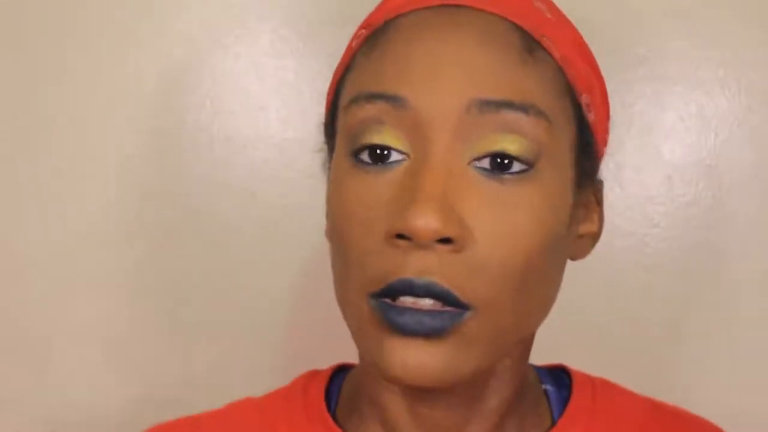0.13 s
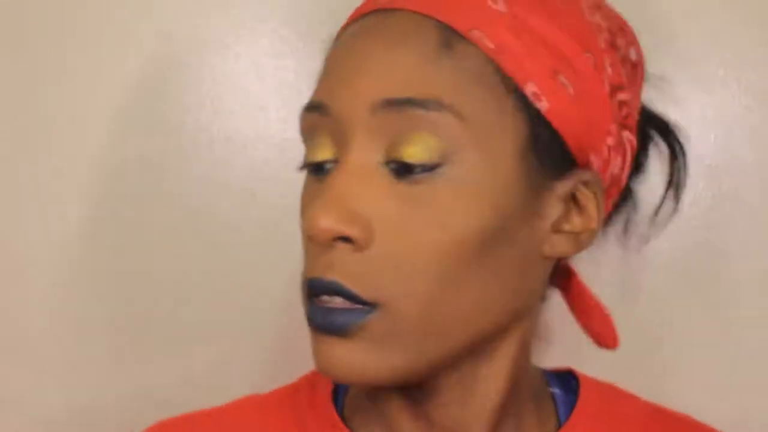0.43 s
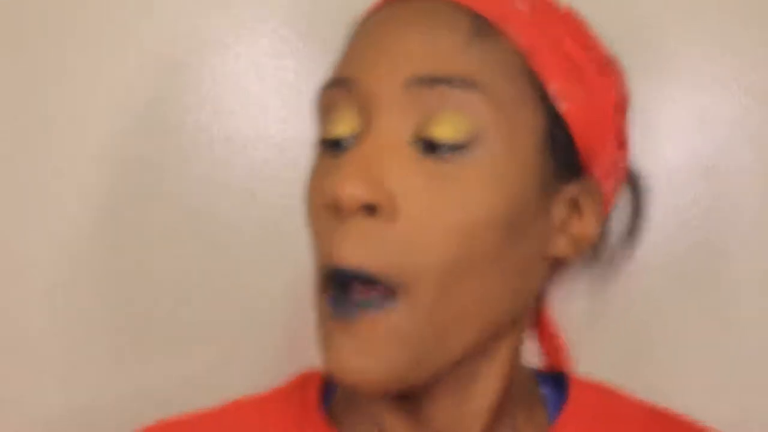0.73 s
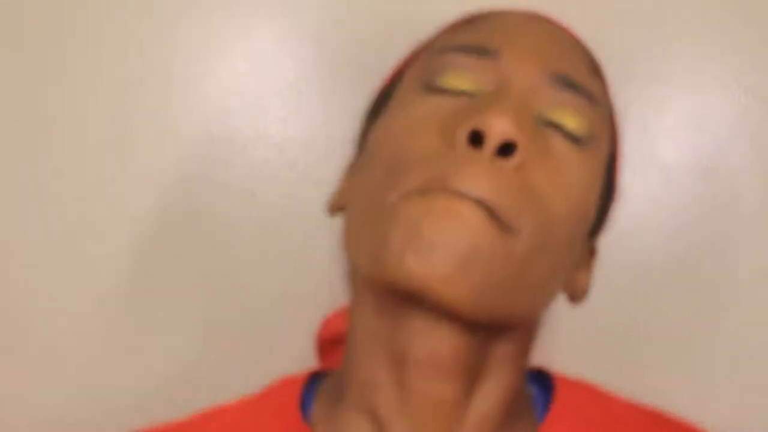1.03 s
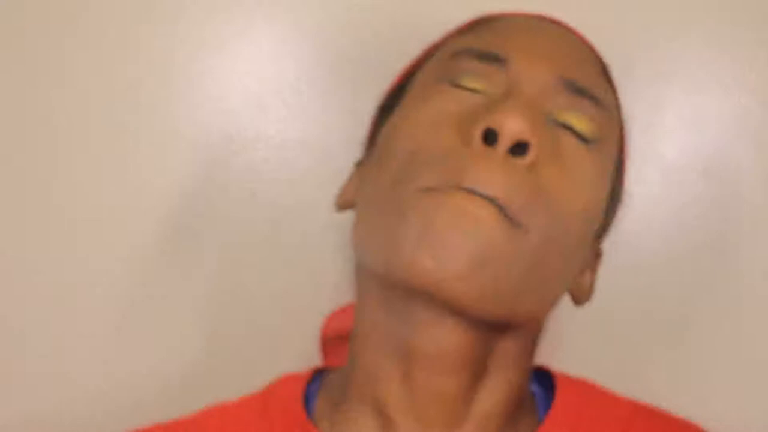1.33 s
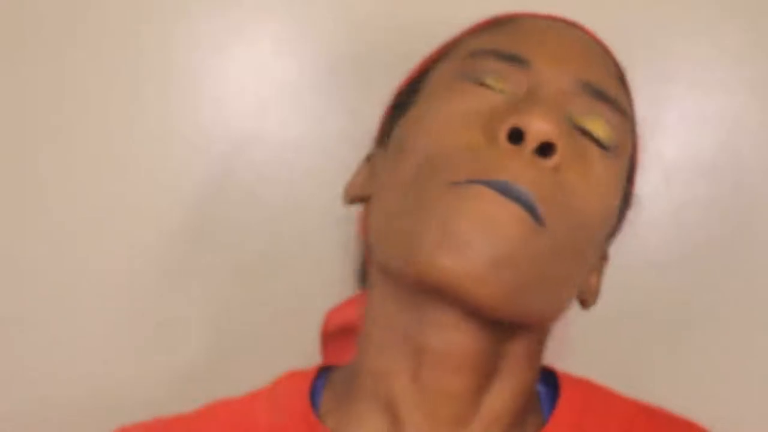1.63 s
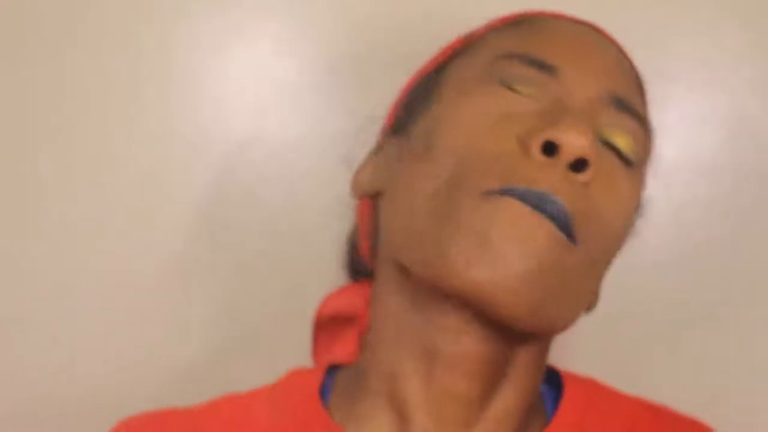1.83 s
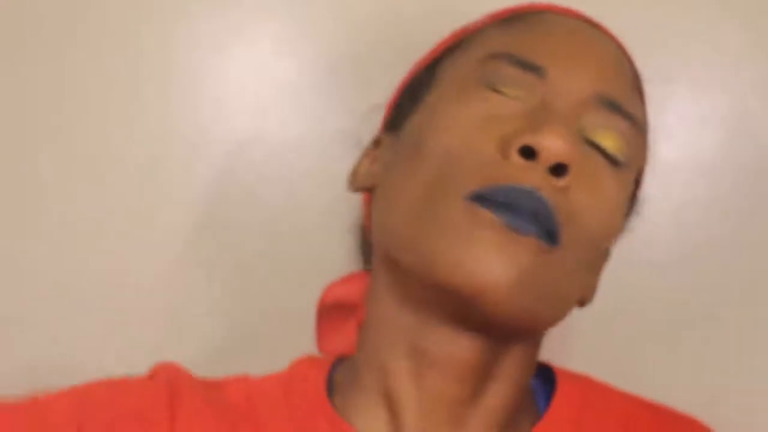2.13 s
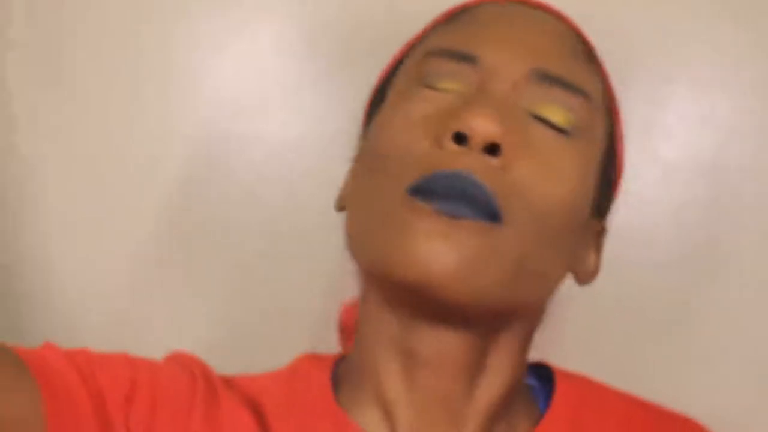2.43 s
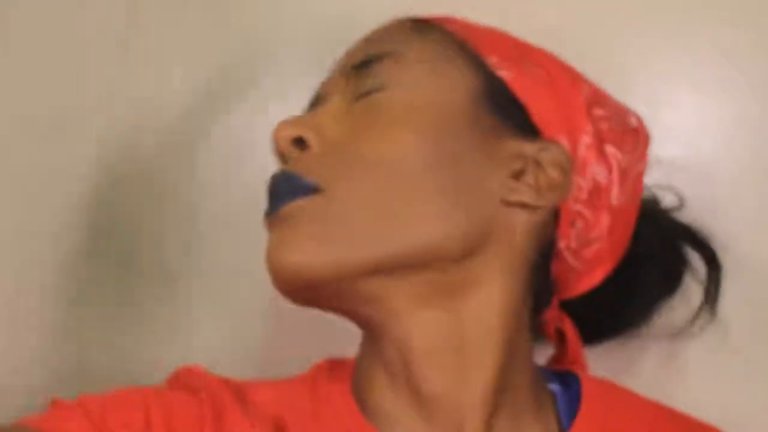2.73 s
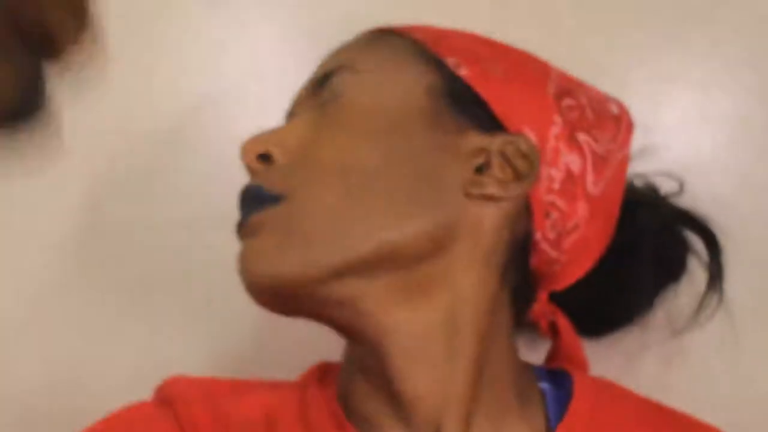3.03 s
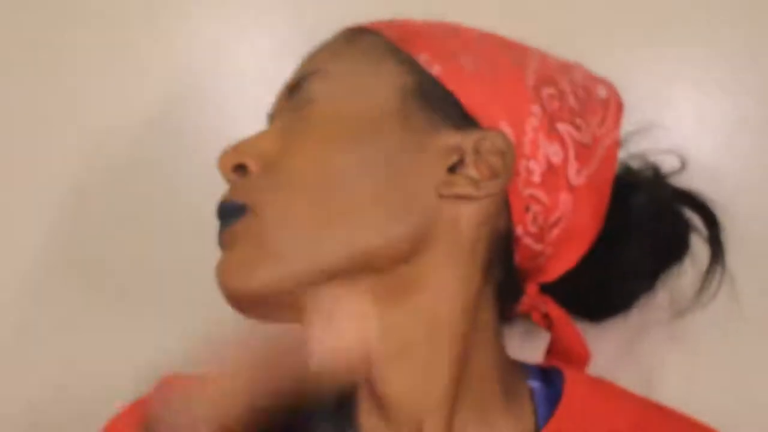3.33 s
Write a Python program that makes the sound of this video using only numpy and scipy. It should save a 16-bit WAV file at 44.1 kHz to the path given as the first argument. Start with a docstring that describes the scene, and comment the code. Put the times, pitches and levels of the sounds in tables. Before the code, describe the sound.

Spray bottle pumped six times, short misty hisses with plastic clicks, after handling knocks and cap snap

```python
"""A spray bottle's finger pump is pressed six times: each stroke hisses out a mist of filtered noise
and droplet ticks, then the plunger sucks back (slips through a rising resonance) and clicks.
Before that, plastic knocks and scrapes as the bottle is picked up; its cap snaps off and is put
aside, made from short contacts that ring. A small, hard-walled room adds echoes and a faint hum."""
import sys
import numpy as np
from scipy import signal
from scipy.fft import rfft, irfft, next_fast_len
from scipy.io import wavfile
from scipy.ndimage import uniform_filter1d, map_coordinates

SR = 44100
rng = np.random.default_rng(int(sys.argv[2]) if len(sys.argv) > 2 else 0)


def unload_audio(sound):
    """Save the sound as a 16-bit wav file, at the path given as the first command line argument."""
    columns = np.transpose(np.atleast_2d(sound))
    # keep every value between -1 and 1, then stretch to whole-number steps
    steps = np.round(np.clip(columns, -1, 1) * 32767)
    wavfile.write(sys.argv[1], SR, steps.astype(np.int16))


N = 154350
TIME = np.arange(N) / SR

# tone of the mist and of the spring's rustle: (frequency [Hz], relative level [dB])
MIST_TONE = [(150, -32), (400, -20.5), (1150, -13.5), (1650, -6), (2800, -2), (4200, -2.5), (6000, -1.5),
             (9400, -6), (10600, -5.5), (13000, -11.5), (15500, -19)]


def amp(db):
    """Decibels to gain."""
    return 10 ** (np.asarray(db) / 20)


def unit(x):
    """Scale to an average strength (rms) of 1."""
    return x / np.sqrt(np.mean(x ** 2) + 1e-20)


def along(points, hz):
    """Read a curve of (Hz, value) points on a log frequency axis."""
    f, v = np.transpose(points)
    return np.interp(np.log(hz + 1), np.log(f + 1), v)


def filtered(x, response):
    """Multiply the spectrum of x by a function of frequency."""
    size = next_fast_len(N + SR // 2)
    spectrum = rfft(x, size) * response(np.fft.rfftfreq(size, 1 / SR))
    return irfft(spectrum, size)[..., :N]


def body(x, tone, size=2048):
    """Colour a sound without smearing it backwards in time; a click keeps its energy."""
    # folding the cepstrum (spectrum of the log spectrum) gives a response that only rings onwards
    cepstrum = irfft(np.log(amp(along(tone, np.fft.rfftfreq(size, 1 / SR)))))
    cepstrum[1:size // 2] *= 2
    cepstrum[size // 2 + 1:] = 0
    response = irfft(np.exp(rfft(cepstrum)))
    return signal.fftconvolve(x, response / np.linalg.norm(response))[:N]


def noise(tone):
    """Coloured noise of rms 1."""
    return unit(body(rng.standard_normal(N), tone))


def wobble(rate):
    """A smooth random curve through this many random points a second."""
    points = rng.standard_normal(int(N * rate / SR) + 4)
    return map_coordinates(points, [TIME * rate])


def fade(start, life):
    """A sudden start and an exponential fall; life is the time [s] to fall to 37 percent."""
    return (TIME >= start) * np.exp(-np.abs(TIME - start) / life)


def ticks(rate):
    """Tiny contacts of random size, about this many a second."""
    return (rng.random(N) < rate / SR) * rng.standard_normal(N)


def impulse(s):
    """One sharp contact, a single sample long."""
    return signal.unit_impulse(N, int(s * SR))


def contact(s):
    """A blow smeared over a millisecond or so by the thin plastic wall."""
    t = np.arange(256) / SR
    smear = np.exp(-t / 0.00037) * rng.standard_normal(len(t))
    # keep only the phases: every frequency is equally strong
    burst = irfft(np.exp(1j * np.angle(rfft(smear))))
    return np.pad(burst, (int(s * SR), N))[:N]


def click(s, ring_db, t60, strike=impulse):
    """A contact and the dense short ring of plastic, which falls 60 dB in t60 seconds."""
    ring = fade(s, t60 / np.log(1000)) * rng.standard_normal(N)
    return strike(s) + amp(ring_db) * ring / np.linalg.norm(ring)


def ringing(x, hz):
    """Lift the resonance of the spot that is struck."""
    b, a = signal.iirpeak(hz, 2.66, SR)  # 2.66: sharpness (Q)
    return x + amp(1.5) * signal.lfilter(b, a, x)


def patchy(x):
    """Each band of the sound swells and sinks a little on its own."""
    bands = signal.stft(x)[2]
    field = rng.standard_normal(bands.shape)
    field = uniform_filter1d(field, size=5, axis=0)  # neighbouring frequencies
    field = uniform_filter1d(field, size=12, axis=1)  # neighbouring moments
    swells = amp(0.73 * unit(field))
    return unit(signal.istft(bands * swells)[1][:N])


def floor():
    """Steady noise of the room's air and two slightly unsteady hum tones."""
    # tone of the air: (frequency [Hz], relative level [dB])
    air_tone = [(20, -2), (40, -4), (80, 0), (300, 0), (600, -5), (1500, -5.5), (4000, -17), (10000, -16.5),
                (15500, -29)]
    # stereo width of the air: (frequency [Hz], side over mid [dB])
    width = [(80, -3), (150, -0.5)]
    # hum tones: (frequency [Hz], average level [dB])
    hum_tones = [(80, -66.5), (140, -70.5)]
    mid = noise(air_tone)
    side = filtered(noise(air_tone), lambda f: amp(along(width, f)))
    hum = 0
    for hz, db in hum_tones:
        level = amp(db + 0.9 * wobble(rate=4.53))
        phase = 2 * np.pi * hz * TIME + 1.0 * wobble(rate=4.47)
        hum = hum + level * np.sqrt(2) * np.sin(phase)
    return amp(-56.5) * np.array([mid + side, mid - side]) + hum


def clatter():
    """Plastic knocks, each chattering on briefly, over the tiny contacts of sliding plastic."""
    # knocks: (time [s], relative level [dB], decay of the chatter [s], pitch of the ring [Hz])
    knock_list = [(.0378, -20.5, 0.0067, 10000), (.043, -18, 0.016, 4430), (0.0683, -19, 0.0045, 11600),
                  (0.1208, -14, .002, 3470), (0.1281, -14, 0.0025, 3050), (.133, -15, 0.021, 6160),
                  (0.2178, -18, 0.0058, 4000), (.223, -18, 0.02, 4380), (.293, -18, 0.0078, 2700),
                  (.298, -20, 0.014, 7800), (0.3998, -16.5, 0.0099, 2760), (0.4074, -22.5, 0.018, 4300),
                  (.448, -29, .003, 10000), (.528, -23, 0.002, 3440), (0.535, -23, 0.011, 6100),
                  (.578, -31, 0.0028, 9000), (.595, -28.5, 0.0034, 6100)]
    # tone of the knocks: (frequency [Hz], relative level [dB])
    knock_tone = [(150, -49), (500, -21.5), (1050, -11.5), (1740, -8), (2600, -0.5), (4500, -4.5),
                  (6500, -2.5), (8000, -9.5), (10500, -10.5), (15000, -30)]
    # loudness of the sliding: (time [s], level [dB])
    slide_level = [(0, -40), (.15, -35.5), (.2, -37.5), (.28, -46.5), (.345, -33.5), (.385, -41.5),
                   (.48, -44), (.495, -36.5), (.61, -41.5), (.66, -49), (.71, -62)]
    # tone of the sliding: (frequency [Hz], relative level [dB])
    slide_tone = [(200, -40), (900, -14), (1800, -7), (2700, -0.5), (4500, 0.5), (6500, -3), (8500, -11.5),
                  (15000, -26)]
    knocks = 0
    for s, db, life, hz in knock_list:
        chatter = amp(-6) * fade(s, life) * ticks(rate=2000)
        knocks = knocks + amp(db + 8) * ringing(contact(s) + chatter, hz)
    sliding = patchy(body(ticks(rate=5000), slide_tone))
    roughness = unit(amp(2 * wobble(rate=280)))
    sliding = sliding * amp(np.interp(TIME, *np.transpose(slide_level))) * roughness
    return body(knocks, knock_tone) + sliding


def cap():
    """A light tick and a hard snap as the cap comes off, then softer and duller knocks."""
    # blows: (time [s], relative level [dB], dull above [Hz])
    blow_list = [(0.7128, -18, 14000), (0.7172, -3.5, 9000), (0.7233, -21.5, 7500), (.773, -14.5, 4500),
                 (.812, -19, 4570)]
    # tone of the blows: (frequency [Hz], relative level [dB])
    blow_tone = [(150, -31), (500, -19), (1150, -7.5), (1600, -6), (2300, -1.5), (3200, -3), (4300, 3.5),
                 (5700, -2.5), (7700, -8.5), (11000, -8.5), (15000, -23)]
    blows = 0
    for s, db, hz in blow_list:
        blow = click(s, ring_db=-4.5, t60=0.14)
        dulled = filtered(blow, lambda f: 1 / (1 + np.sqrt(2) * 1j * f / hz - (f / hz) ** 2))
        blows = blows + amp(db + 7) * dulled
    return body(blows, blow_tone)


def put_down():
    """The hollow cap rattles, then lands with a compact clack: smeared blows with a short ring."""
    # blows: (time [s], relative level [dB], pitch of the ring [Hz])
    blow_list = [(0.8115, -16.5, 2150), (.819, -26, 1800), (0.829, -21, 2450), (0.849, -23.5, 2500),
                 (.975, -10.5, 1830)]
    # tone of the blows: (frequency [Hz], relative level [dB])
    blow_tone = [(150, -14), (380, 4.5), (900, -8.5), (1650, 5), (2450, 7.5), (4000, -5.5), (6000, -13),
                 (15000, -38)]
    blows = 0
    for s, db, hz in blow_list:
        blow = click(s, ring_db=-9, t60=0.045, strike=contact)
        blows = blows + amp(db - 3) * ringing(blow, hz)
    return body(blows, blow_tone)


def mist(start, length, db, rise, treble_db, jet_db):
    """The nozzle's hiss follows a pressure that builds and drains; its jet's whistle follows more steeply."""
    release_s, treble_hz, jet_hz = 0.031, 7500, 6120
    age = np.maximum(TIME - start, 0)
    build = np.sqrt((1 - np.exp(-age / rise)) * (1 - np.exp(-(age + 0.028) / rise)))
    drain = np.exp(-np.maximum(age - length, 0) / release_s)
    pressure = build * drain

    droplets = amp(-7.5) * unit(ticks(rate=1100))
    spray = patchy(body(rng.standard_normal(N) + droplets, MIST_TONE))
    hiss = filtered(spray, lambda f: amp(treble_db * f ** 4 / (f ** 4 + treble_hz ** 4)))

    # two random curves on a sine and a cosine make a narrow band of noise around jet_hz
    turn = 2 * np.pi * jet_hz * TIME
    whistle = unit(wobble(rate=1500) * np.sin(turn) + wobble(rate=1600) * np.cos(turn))
    jet = amp(jet_db) * pressure ** 2 * whistle
    sputter_db = 0.5 * wobble(rate=150)
    return amp(db + sputter_db) * pressure * (hiss + jet)


def gurgles():
    """Two faint low gulps of liquid in the bottle: quickly fading bands of noise."""
    # gulps: (time [s]); the last falls at the very end and is not heard
    gulp_times = [1.1, 1.622, 3.5]
    gulp_hz = 543
    band = filtered(rng.standard_normal(N),
                    lambda f: 1 / (1 + (2 * (f / gulp_hz - gulp_hz / (f + 1))) ** 2))
    return amp(-45.5) * unit(band) * sum(fade(s, 0.0052) for s in gulp_times)


def plunger():
    """The seal rasps back through a rising resonance; the plunger hits, rebounds twice, its spring rustles."""
    # returns: (time of the click [s], relative click level [dB], suck level [dB], rustle level [dB])
    return_list = [(1.376, -29, -39, -38.5), (1.803, -17, -44, -36.5), (2.2133, -12, -47, -42.5),
                   (2.5969, -10, -51, -42), (2.988, -9.5, -44.5, -39.5), (3.372, -17, -44.5, -42)]
    # tone of the clicks: (frequency [Hz], relative level [dB])
    click_tone = [(200, -23), (1200, -15.5), (2100, -9.5), (2900, 0.5), (3800, -8.5), (5000, 3), (6200, 5),
                  (8200, -6.5), (11000, -11.5), (15500, -19)]
    rebound_s, suck_lead_s = 0.0032, 0.027
    suck_hz, suck_rise, suck_width_hz = 2820, 58000, 400  # suck_rise in Hz per second
    clicks, rustle, suck = np.zeros((3, N))
    for s, click_db, suck_db, rustle_db in return_list:
        hit = click(s, ring_db=-21, t60=0.092, strike=contact)
        rebounds = sum(contact(s + k * rebound_s) for k in (1, 2))
        clicks += amp(click_db + 3.5) * (hit + amp(-7.5) * rebounds)
        rustle += amp(rustle_db) * fade(s, 0.037)

        # the resonance climbs to suck_hz at the click, then stays there
        pitch = suck_hz + suck_rise * np.minimum(TIME - s, 0)
        turn = np.exp(2j * np.pi * np.cumsum(pitch) / SR)
        # slips of equal size ring in a filter that turns along with the pitch
        slips = np.sign(ticks(rate=600)) / turn
        rung = signal.lfilter([1], [1, -np.exp(-np.pi * suck_width_hz / SR)], slips)
        rasp = unit(np.imag(rung * turn))
        swell = np.clip(2 * (TIME - s + suck_lead_s) / suck_lead_s, 0, 1)
        suck += amp(suck_db) * fade(s - suck_lead_s, 0.04) * swell * rasp
    spring = rustle * unit(body(ticks(rate=7100), MIST_TONE))
    return body(clicks, click_tone) + spring + suck


def room(x, wet_db, pan):
    """Direct sound, nearby walls and an echo tail that dies faster in the treble than in the bass."""
    # time for the tail to fall by 60 dB: (frequency [Hz], time [s])
    tail_t60 = [(500, 0.82), (2500, 0.58), (6000, 0.47), (10000, 0.51)]
    # tone of the echoes: (frequency [Hz], relative level [dB])
    echo_tone = [(600, -1), (1300, -3), (7000, -.5), (14000, -9)]
    hz, t, bands = signal.stft(rng.standard_normal((2, SR * 3 // 5)), SR, nperseg=256)
    decay = amp(-60 * t / along(tail_t60, hz)[:, None])
    tail = signal.istft(bands * decay, SR, nperseg=256)[1]
    t = np.arange(tail.shape[1]) / SR
    tail *= np.minimum(t / 0.0016, 1)

    # early echoes: scattered single reflections that start after 2 ms
    early = (rng.random(tail.shape) < 1500 / SR) * rng.standard_normal(tail.shape)
    early = early * (t > .002) * np.exp(-t / 0.0071)
    answer = tail / np.linalg.norm(tail, axis=1, keepdims=True)
    answer = answer + amp(-0.5) * early / np.linalg.norm(early, axis=1, keepdims=True)

    echoes = signal.fftconvolve(x[None], answer, axes=1)[:, :N]
    wet = filtered(echoes, lambda f: amp(wet_db + along(echo_tone, f)))
    # half of the left-right difference goes to each channel
    return filtered(x + wet, lambda f: amp(np.outer([1, -1], along(pan, f)) / 2))


def scene():
    """The pump has weaker echoes than the handling; each sound gets its own random echoes."""
    # strokes: (start [s], time until the pressure drains [s], level [dB], pressure rise [s],
    #           treble lift [dB], whistle of the jet over the hiss [dB])
    strokes = [(1.094, 0.13, -33, 0.096, 0.5, -23), (1.551, .14, -35.5, 0.039, 2, -15),
               (1.981, 0.13, -35, 0.035, 4, -6), (2.378, 0.11, -34, 0.025, 1.5, -6),
               (2.746, 0.13, -32, 0.025, 0.5, -5), (3.139, 0.12, -32, 0.02, -2, -43)]
    # left-right balance of the handling: (frequency [Hz], left over right [dB])
    handling_pan = [(200, -11), (1000, 1), (5000, 2.5), (9000, -0.5)]
    # left-right balance of the pump: (frequency [Hz], left over right [dB])
    pump_pan = [(200, -2), (1500, 1), (3000, 3.5), (9000, 0)]
    background = floor()
    handling = sum(room(x, -0.5, handling_pan) for x in (clatter(), cap(), put_down()))
    pump_sounds = [mist(*stroke) for stroke in strokes] + [gurgles() + plunger()]
    pump = sum(room(x, -5.5, pump_pan) for x in pump_sounds)
    return handling + pump + background


def record(dry):
    """Keep nothing at or above a sharp limit of 15780 Hz."""
    return filtered(dry, lambda hz: hz < 15780)


dry = scene()
out = record(dry)
unload_audio(out)
```